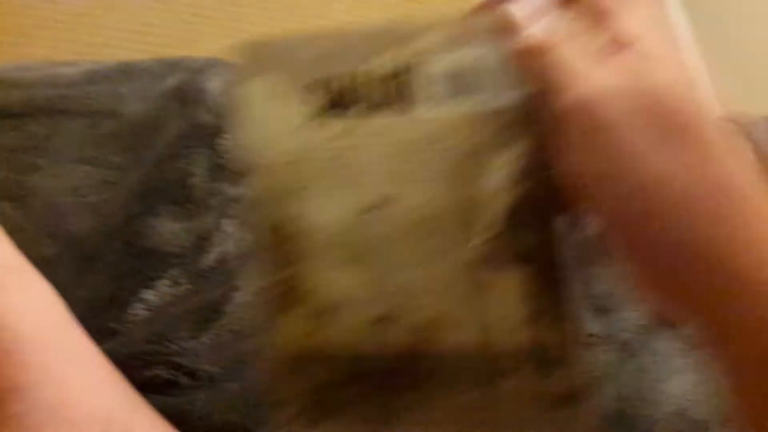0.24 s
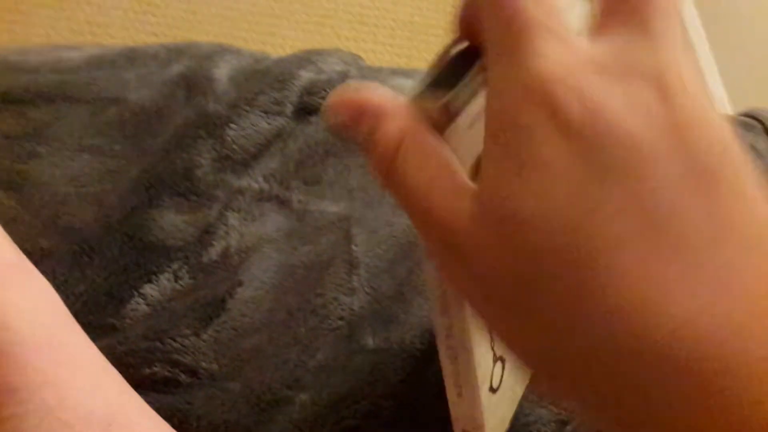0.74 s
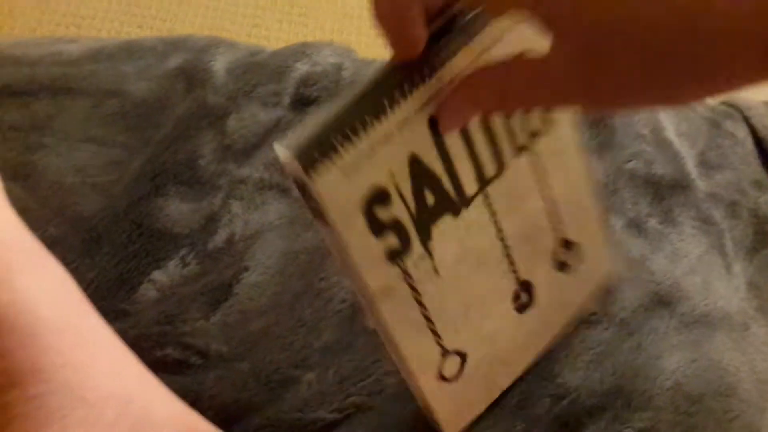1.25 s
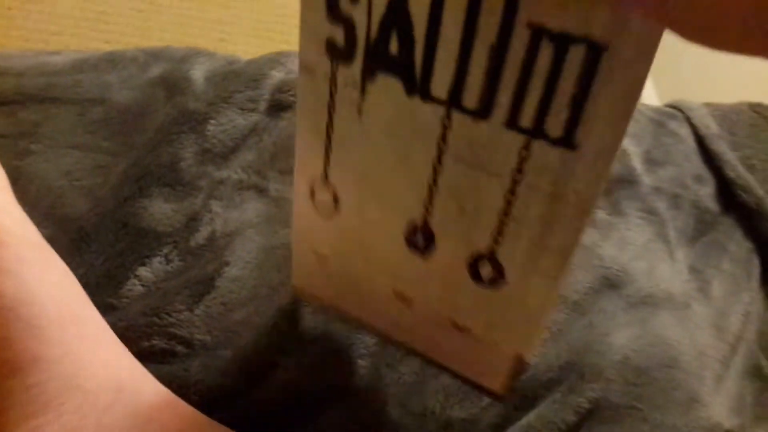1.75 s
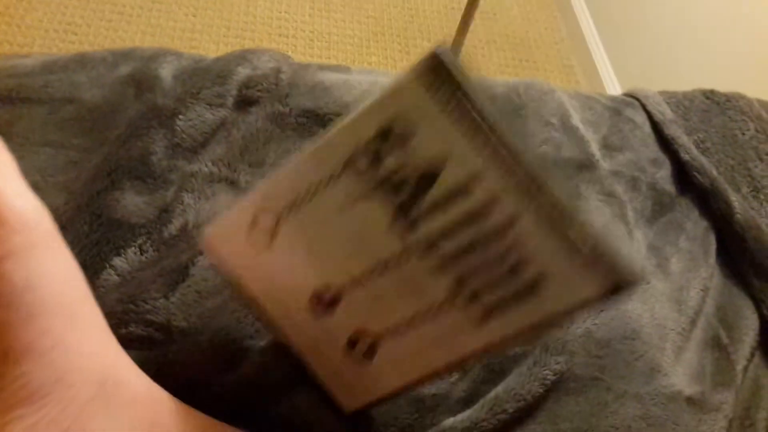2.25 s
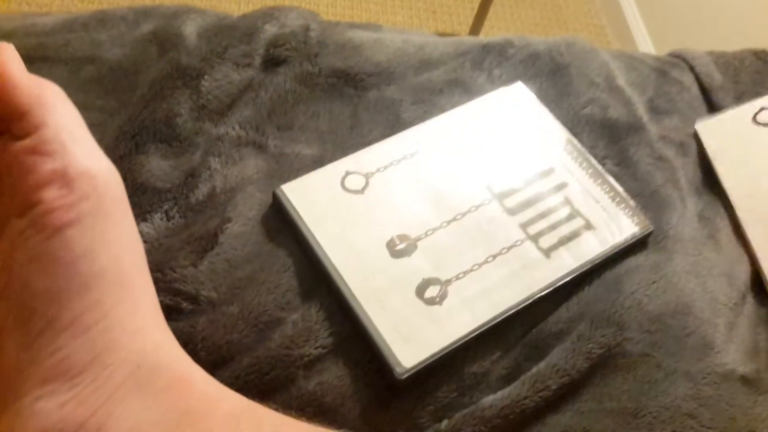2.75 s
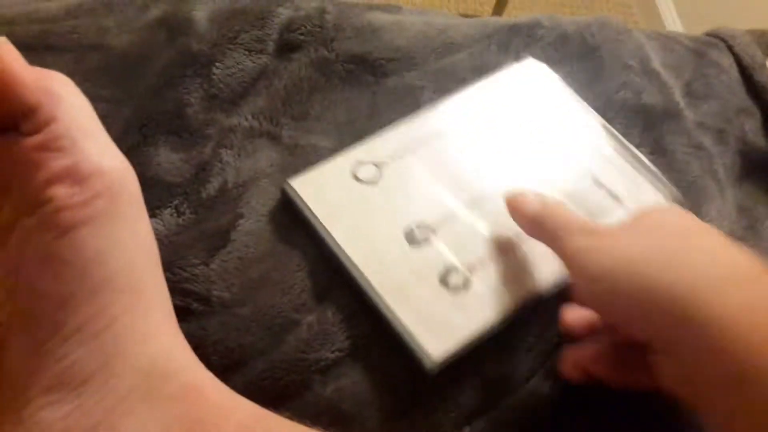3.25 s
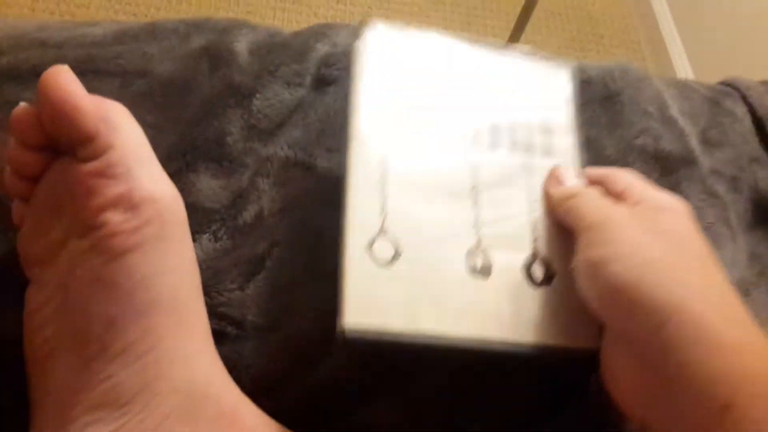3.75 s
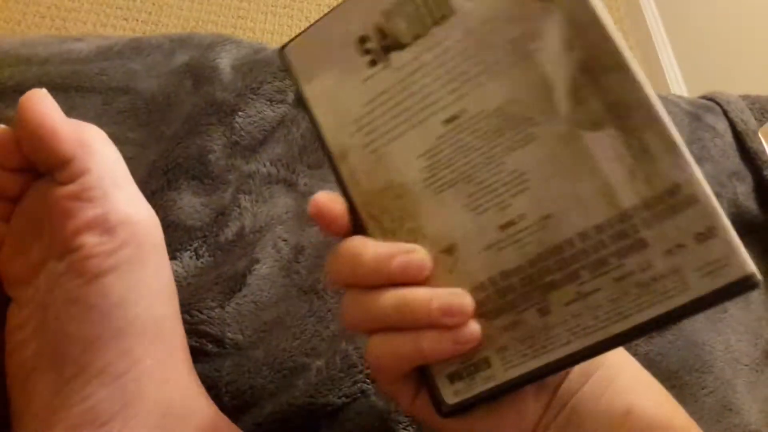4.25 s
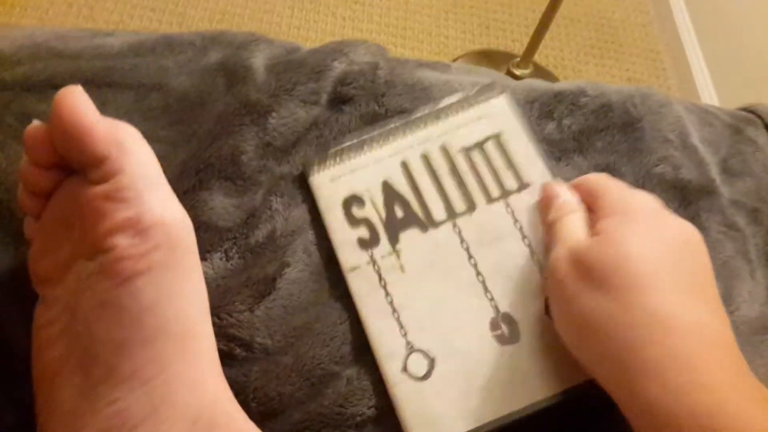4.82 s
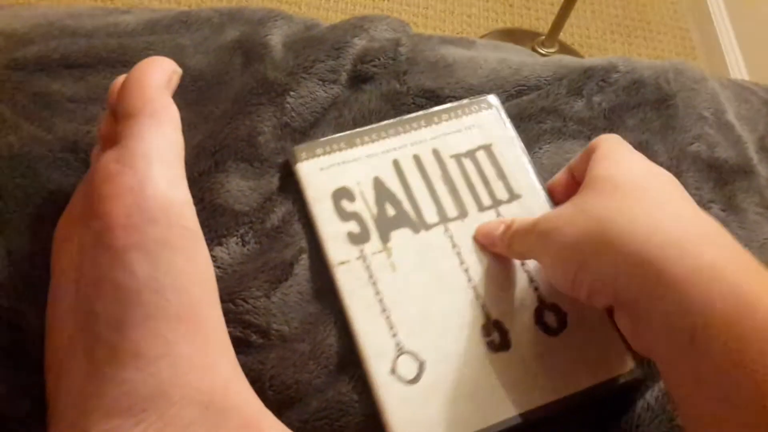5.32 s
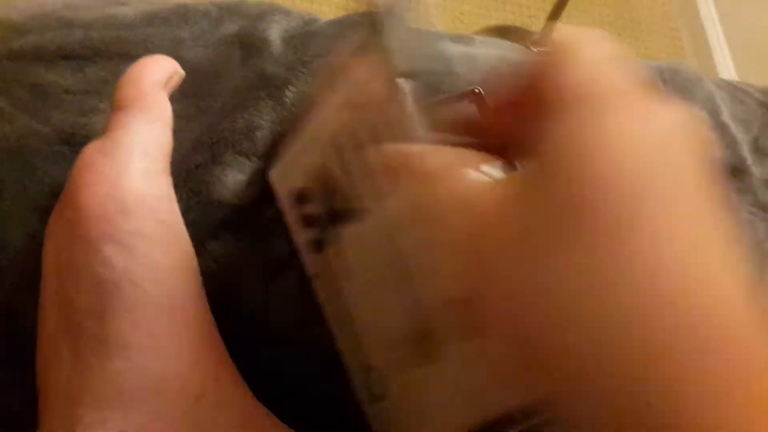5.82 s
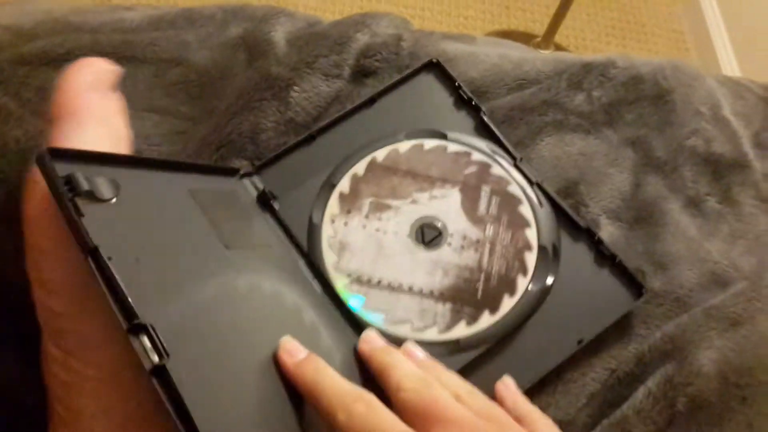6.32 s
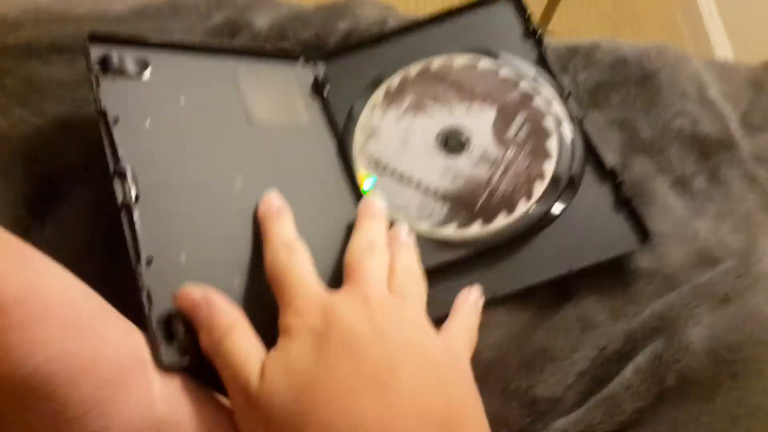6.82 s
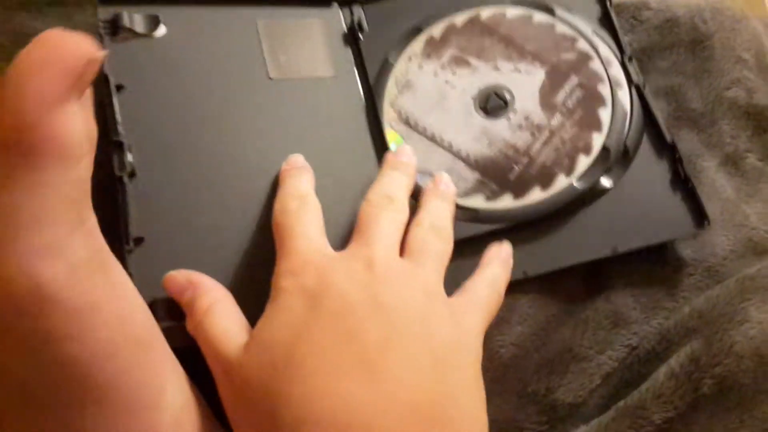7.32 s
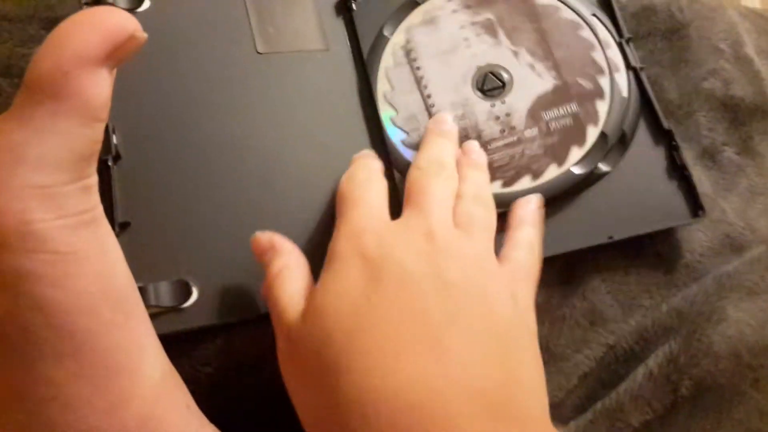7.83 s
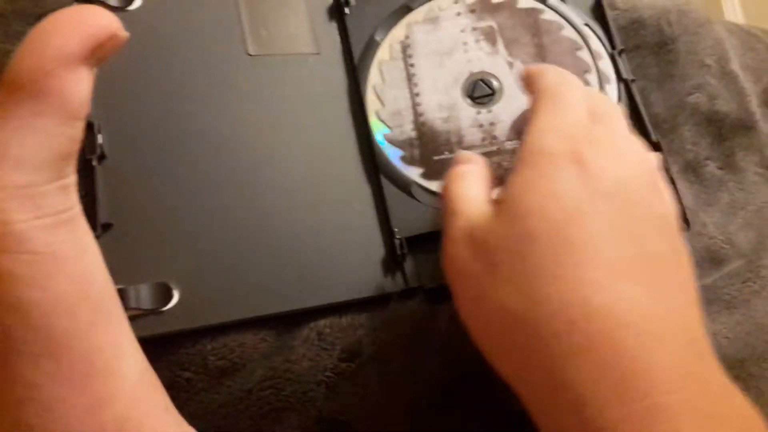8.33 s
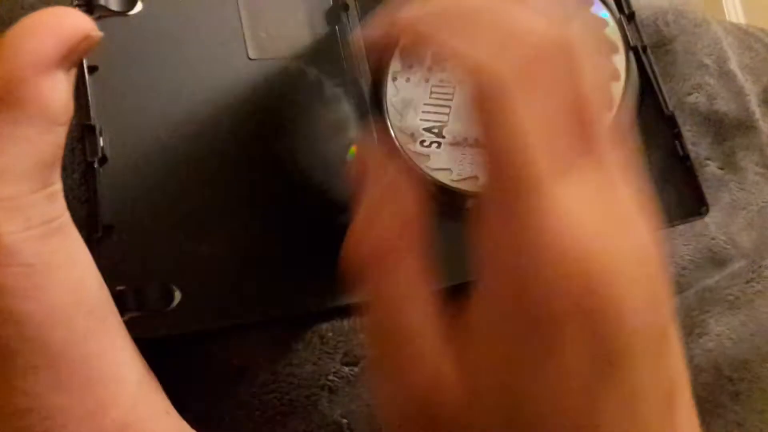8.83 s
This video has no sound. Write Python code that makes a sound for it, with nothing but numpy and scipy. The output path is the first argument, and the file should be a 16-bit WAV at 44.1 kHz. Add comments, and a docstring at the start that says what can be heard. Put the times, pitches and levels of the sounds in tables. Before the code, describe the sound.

A small quiet bedroom, close hand-held microphone, faint hiss and a wavering low mains hum that fades out by about 5 seconds. From 0 to 1.6 s, soft rubs, light ticks and a short bright scrape at 0.85 as card and plastic are handled; a sharp click at 1.6. From 1.75 to 2.3 a loud, rasping, uneven scrape as the case slides from its sleeve. It lands at 2.6 with a muted plastic clack and soft thump. Taps and rubs from 2.9 to 5.4 as it is picked up, turned and set down. At 5.7 very loud, hard latch snaps in quick succession; another sharp crack and bright scraping around 6.13. Cloth whirrs low and wavering from 6.6 to 7. Finger knocks at 7.1 and 7.4, sparse quiet clicks around 8, then a rattling cluster of tray clacks and scrapes from 8.6 to 9.

```python
"""A plastic disc case is drawn out of a card sleeve, dropped on a blanket, picked up, turned over and snapped open.
Knocks and snaps ring the thin shell: short pushes drive its resonances. Card, cloth and fingers rub and scrape
over it as shaped noise, with stray ticks; the cloth whirrs under the open case, and a hinged tray rattles at the end.
Hands and bedding bump softly, as low noise. It is a small bedroom with sparse echoes, faint hiss and mains hum,
heard by one hand-held microphone."""
import sys
import numpy as np
from scipy import signal
from scipy.fft import rfft, irfft
from scipy.io import wavfile
from scipy.ndimage import uniform_filter1d

SR = 44100
rng = np.random.default_rng(int(sys.argv[2]) if len(sys.argv) > 2 else 0)


def dump_mix(stems):
    """Bounce the given channels to the path in sys.argv[1] as a 16-bit WAV at rate SR."""
    frames = np.atleast_2d(stems).T  # one column per channel
    limited = np.clip(frames, -1, 1)  # hard clip at full scale
    pcm = np.round(limited * 32767).astype(np.int16)
    wavfile.write(sys.argv[1], SR, pcm)


N = 399987
TIME = np.arange(N) / SR  # seconds


def amp(db):
    """Turns decibels into gain."""
    return 10 ** (np.asarray(db) / 20)


def unit(x):
    """Scales a sound to an rms of 1."""
    return x / np.sqrt(np.mean(x ** 2) + 1e-20)


def read(points, hz):
    """Reads a table between its points, with pitch on a logarithmic axis."""
    table_hz, value = np.transpose(points)
    return np.interp(np.log(hz + 1), np.log(table_hz + 1), value)


def follow(rows):
    """Draws each column of a timed table as a curve with a value at every sample."""
    time_s, *columns = np.transpose(rows)
    return [np.interp(TIME, time_s, column) for column in columns]


def add(mix, start_s, sound):
    """Lays a sound into the mix at its start time, cut off at the end of the mix."""
    start = round(start_s * SR)
    part = mix[start:start + len(sound)]
    part += sound[:len(part)]


def colour(x, points, size=4096):
    """Filters a sound to the given spectrum, without any sound ahead of its cause."""
    hz = abs(np.fft.fftfreq(size, 1 / SR))
    log_gain = np.log(amp(np.maximum(read(points, hz), -100)))
    # the Hilbert transform gives the phase that puts the response after the input
    taps = np.fft.ifft(np.exp(np.conj(signal.hilbert(log_gain)))).real[:size // 2]
    return signal.fftconvolve(x, taps)[:len(x)]


def drift(hz):
    """A random curve of rms 1 whose changes fade out above about hz per second."""
    f = np.fft.rfftfreq(N, 1 / SR)
    spectrum = rfft(rng.standard_normal(N)) / (1 + (f / hz) ** 4)
    return unit(irfft(spectrum, N))


def resonate(x, hz, width):
    """A resonance of gain 1 at a fixed or moving pitch; a narrower width rings longer."""
    turn = np.exp(2j * np.pi * np.cumsum(hz * np.ones(len(x))) / SR)
    r = np.exp(-np.pi * width / SR)
    # shift the pitch down to zero, smooth there, and shift back up
    smooth = signal.lfilter([1 - r], [1, -r], x / turn + 1e-18)
    return 2 * (turn * smooth).real


# the ways the whole shell can ring; the caller's weight is added to each level
# columns: pitch_hz [Hz], width_hz [Hz], level_db [dB]
SHELL_MODES = [(272, 50, 2), (456, 200, -10), (614, 13, -22), (738, 110, -12.5), (1012, 93, -2),
               (1717, 190, 3.5), (1820, 170, -19), (2314, 320, 2), (3280, 104, 1.5), (3260, 170, -13),
               (3960, 110, -1), (4160, 260, 4), (4610, 320, 3)]


def shell(x, weights_db):
    """The push itself plus the ringing of each mode of the thin shell."""
    out = x.copy()
    for (hz, width, level_db), weight_db in zip(SHELL_MODES, weights_db):
        r = np.exp(-np.pi * width / SR)
        feedback = [1, -2 * r * np.cos(2 * np.pi * hz / SR), r * r]
        out += amp(level_db + weight_db) * signal.lfilter([1 - r, 0, r - 1], feedback, x)
    return out


# loudness of the mains hum, before its waver
# columns: time_s [s], level_db [dB]
HUM_LEVEL = [(0, -59.5), (1.2, -54), (2.1, -53), (2.9, -62.5), (3.2, -65), (3.8, -70.5), (4.4, -59),
             (5.2, -105), (9.07, -83)]
# colour of the hiss in the still room; only the balance counts, as AIR_DB sets the level
# columns: pitch_hz [Hz], density_db [dB per Hz, relative]
AIR_COLOUR = [(18, -58), (30, -15), (48, -27), (108, 8.5), (243, -0.5), (673, -10), (1020, -7), (1200, -10),
              (1720, -12), (2020, -10.5), (3590, -11), (4660, -8), (5590, -14), (14300, -14.5),
              (15500, -14.5)]
AIR_DB = -65


def background(hum_hz=120, second_db=-12, third_db=-22, waver_db=3.0, waver_hz=0.97):
    """Faint hiss, and a mains hum of three harmonics that wavers slightly in pitch and loudness."""
    turn = 2 * np.pi * np.cumsum(hum_hz + waver_hz * drift(8.7)) / SR
    hum = np.sin(turn) + amp(second_db) * np.sin(2 * turn) + amp(third_db) * np.sin(3 * turn)
    hum_gain = amp(follow(HUM_LEVEL)[0] + waver_db * drift(3.6))
    hiss = unit(colour(rng.standard_normal(N), AIR_COLOUR))
    return hum_gain * unit(hum) + amp(AIR_DB) * hiss


# a stroke gathers speed, holds and slows down: shares of its length
ATTACK_SHARE, RELEASE_SHARE = 0.24, 0.48


def swell(length_s):
    """Attack, hold and release of one movement, as a gain from 0 to 1."""
    u = np.linspace(0, 1, max(round(length_s * SR), 2))
    return np.clip(np.minimum(u / ATTACK_SHARE, (1 - u) / RELEASE_SHARE), 0, 1)


# strokes of fingers, card and cloth over the case; the gap is the one under the sliding edge
# columns: start_s [s], length_s [s], dull_rub_db [dB before trim], bright_scrape_db [dB before trim],
# gap_pitch_hz [Hz]
STROKES = [(0.215, 0.18, -66, -62.5, 4340), (0.563, 0.61, -58, -55.5, 4230),
           (0.827, 0.089, -58, -39.5, 2700), (0.865, 0.12, -61, -50.5, 3650), (1.1, 0.22, -60.5, -56, 3700),
           (1.238, 0.18, -51.5, -58, 3800), (1.32, 0.42, -61.5, -60.5, 4000), (1.627, 0.24, -63, -57, 4200),
           (2.307, 0.14, -54, -57, 3950), (2.377, 0.55, -66, -63, 3800), (2.777, 0.31, -60.5, -58, 4000),
           (3.244, 0.3, -68, -56.5, 4500), (3.358, 0.4, -60.5, -58.5, 4000),
           (3.6, 0.28, -52.5, -56.5, 3960), (4.03, 0.46, -65, -63, 4000), (4.742, 0.29, -66.5, -60.5, 4200),
           (4.976, 0.11, -52, -53.5, 3700), (5.244, 0.086, -65.5, -63.5, 4200),
           (5.943, 0.37, -55.5, -48, 3660), (6.159, 0.15, -53, -40.5, 3900),
           (6.245, 0.21, -54.5, -51, 4740), (6.49, 0.84, -56.5, -51, 4420), (7.195, 0.2, -52.5, -53, 1660),
           (7.505, .15, -59, -51, 4360), (7.889, 0.1, -68, -54.5, 4000), (8.002, .06, -67, -62, 3850),
           (8.2, 0.28, -76, -59, 4180), (8.409, .09, -67, -55.5, 4150), (8.628, .085, -54.5, -55, 4100),
           (8.797, .1, -59, -58, 4300), (8.871, 0.25, -55, -46, 4220)]
# the long pull out of the card sleeve
# columns: time_s [s], dull_rub_db [dB before trim], bright_scrape_db [dB before trim],
# gap_pitch_hz [Hz], gap_strength_db [dB]
SLEEVE_PULL = [(1.73, -64, -53, 4330, 2), (1.775, -50.5, -35, 4060, -6), (1.82, -53.5, -36.5, 3080, 13),
               (1.89, -52.5, -45.5, 2900, 8), (1.96, -56, -37.5, 3850, -19), (2.07, -56.5, -36.5, 2450, 8),
               (2.12, -54, -38, 3750, -16), (2.21, -49, -36, 3250, -12), (2.28, -50.5, -43, 3150, 0),
               (2.305, -50, -70, 3500, -10)]
# the holding hand is never quite still: levels between strokes (dB before trim), and the gap at rest
REST_RUB_DB, REST_SCRAPE_DB, REST_GAP_HZ = -70.5, -76, 4040
# pressing the gap below its resting pitch makes it resonate more: at rest (dB), gain per octave, most (dB)
OPEN_GAP_DB, GAP_DB_PER_OCTAVE, MOST_GAP_DB = -6, 31, 8


def movement():
    """Adds up the power of strokes and pull: gives rub gain, scrape gain, gap pitch and gap strength."""
    rub_power = np.full(N, amp(REST_RUB_DB) ** 2)
    scrape_power = np.full(N, amp(REST_SCRAPE_DB) ** 2)
    weighted_hz = scrape_power * REST_GAP_HZ
    for start_s, length_s, rub_db, scrape_db, gap_hz in STROKES:
        power = swell(length_s) ** 2
        stroke_scrape = amp(scrape_db) ** 2 * power
        add(rub_power, start_s, amp(rub_db) ** 2 * power)
        add(scrape_power, start_s, stroke_scrape)
        add(weighted_hz, start_s, stroke_scrape * gap_hz)
    stroke_hz = weighted_hz / scrape_power  # the loudest stroke counts most
    octaves_down = np.log2(REST_GAP_HZ / stroke_hz)
    stroke_db = np.minimum(OPEN_GAP_DB + GAP_DB_PER_OCTAVE * octaves_down, MOST_GAP_DB)

    pull_rub_db, pull_scrape_db, pull_hz, pull_db = follow(SLEEVE_PULL)
    pulling = (TIME > SLEEVE_PULL[0][0]) & (TIME < SLEEVE_PULL[-1][0])
    rub = np.sqrt(rub_power + pulling * amp(pull_rub_db) ** 2)
    scrape = np.sqrt(scrape_power + pulling * amp(pull_scrape_db) ** 2)
    return rub, scrape, np.where(pulling, pull_hz, stroke_hz), np.where(pulling, pull_db, stroke_db)


def friction(grains_per_s, spread_db, smooth_db, flutter_db, flutter_hz):
    """Tiny catches of uneven size over a smooth hiss, under a pressure that flutters."""
    sizes = amp(spread_db * np.minimum(rng.exponential(1, N), 4))
    catches = rng.random(N) < grains_per_s / SR
    grains = unit(sizes * rng.choice([-1, 1], N) * catches)
    hiss = amp(smooth_db) * rng.standard_normal(N)
    return (grains + hiss) * amp(flutter_db * drift(flutter_hz))


def wander(x, depth_db, size=512):
    """As the contact travels, patches of the spectrum swell and fade."""
    z = signal.stft(x, nperseg=size)[2]
    patches = uniform_filter1d(rng.standard_normal(z.shape), size=9, axis=0)  # neighbouring pitches
    patches = unit(uniform_filter1d(patches, size=8, axis=1))  # neighbouring moments
    return signal.istft(z * amp(depth_db * patches), nperseg=size)[1][:N]


# colour of the dull rub, before the shell rings
# columns: pitch_hz [Hz], density_db [dB per Hz, relative]
RUB_COLOUR = [(70, -12), (170, -0.5), (300, 2.5), (600, 0.5), (1000, -6.5), (1500, -8.5), (2200, -17),
              (4000, -28.5), (12000, -49)]
# colour of the bright scrape, before the shell and gap ring
# columns: pitch_hz [Hz], density_db [dB per Hz, relative]
SCRAPE_COLOUR = [(500, -36), (1000, -3.5), (1300, -12), (1700, -6.5), (2100, -5), (3000, 2.5), (4300, 4),
                 (5300, 0.5), (7300, -8.5), (9000, -12), (12500, -14.5), (15500, -16)]


def sliding(rub, scrape, gap_hz, gap_db, rub_trim_db=-1, scrape_trim_db=-1, rub_modes_db=-3,
            scrape_modes_db=-10, gap_width=420, upper_ratio=1.9, upper_db=-2, upper_width=700):
    """Friction drives the shell: a dull rub from skin and cloth, a bright scrape from card and plastic."""
    dull = friction(grains_per_s=400, spread_db=2.5, smooth_db=-0.5, flutter_db=-1.5, flutter_hz=35)
    bright = friction(grains_per_s=970, spread_db=-2.0, smooth_db=3.0, flutter_db=0.44, flutter_hz=68.5)
    dull = shell(colour(dull, RUB_COLOUR), np.full(len(SHELL_MODES), rub_modes_db))
    bright = colour(wander(bright, depth_db=2.3), SCRAPE_COLOUR)
    bright = shell(bright, np.full(len(SHELL_MODES), scrape_modes_db))
    gap = resonate(bright, gap_hz, gap_width)
    gap += amp(upper_db) * resonate(bright, upper_ratio * gap_hz, upper_width)
    bright += amp(gap_db) * gap
    # even out the loudness: the gap changes the colour, the stroke sets the level
    bright /= np.sqrt(uniform_filter1d(bright ** 2, size=3000))
    return amp(rub_trim_db) * rub * unit(dull) + amp(scrape_trim_db) * scrape * bright


def creaks(scrape, per_s=30, gain_db=-8, spread_db=3):
    """The gripped shell gives off faint stray ticks, louder while it slides."""
    sizes = amp(spread_db * np.minimum(rng.exponential(1, N), 2))
    ticks = sizes * (rng.random(N) < per_s / SR)
    ticks = shell(colour(ticks, CONTACT_COLOUR), np.zeros(len(SHELL_MODES)))
    ticks = colour(ticks, [(100, -8), (400, 3), (2000, -5.5), (4000, 5.5)])  # (Hz, dB)
    return amp(gain_db) * scrape * unit(ticks)


# low bumps of the hands and bedding
# columns: start_s [s], length_s [s], level_db [dB before trim]
BUMPS = [(1.343, 0.14, -57), (2.35, 0.088, -60), (2.606, 0.045, -44), (2.875, 0.11, -54), (3.43, 0.13, -65),
         (3.715, 0.3, -58.5), (4.58, 0.096, -57), (4.87, .09, -58), (5, 0.075, -50), (5.683, 0.038, -36),
         (5.819, 0.0432, -48), (6.118, .04, -47), (6.963, 0.37, -60), (7.178, 0.13, -47.5),
         (7.293, 0.21, -51), (7.475, 0.19, -55.5)]


def bumps(rub, trim_db=-1, with_rub_db=-7, with_hum_db=-8):
    """Soft low thumps of shaped noise; a little rumble goes with every rub, and lies under the hum."""
    level = amp(with_rub_db) * rub + amp(with_hum_db + follow(HUM_LEVEL)[0])
    for start_s, length_s, level_db in BUMPS:
        add(level, start_s, amp(level_db + trim_db) * swell(length_s))
    low_colour = [(15, 1), (35, -36), (60, 2.0), (90, 4.0), (135, 5.5),
                  (200, -12.0), (400, -31.5), (2000, -70)]  # (Hz, dB)
    return level * unit(colour(rng.standard_normal(N), low_colour))


# a small, high panel clacks and a wide, low one thuds: where both are equal, and the lean either way
EVEN_PANEL_HZ, LEAN_DB_PER_OCTAVE = 484, 2
# brief or forceful contacts have the sharpest edge: its level under the crack for an ordinary tap,
# then its rise per halving of the contact and per dB of level
EDGE_DB, EDGE_DB_PER_HALVING, EDGE_PER_LEVEL = -17.5, 4.0, 0.26
TAP_S, TAP_DB = 0.006, -40  # the ordinary tap


def registers(contact_s, level_db, weight_db, panel_hz):
    """Levels in dB of thud, clack, crack and edge for one contact, from low to high."""
    lean_db = LEAN_DB_PER_OCTAVE * np.log2(panel_hz / EVEN_PANEL_HZ)
    briefness_db = EDGE_DB_PER_HALVING * np.log2(TAP_S / contact_s)
    edge_db = EDGE_DB + briefness_db + EDGE_PER_LEVEL * (level_db - TAP_DB)
    return level_db + np.array([weight_db - lean_db, weight_db + lean_db, 0, edge_db])


# knocks, snaps and finger taps: the sleeve, the landing on the blanket, picking up and turning over,
# the two latches letting go, fingers on the open case and disc, and the hinged tray swinging over
# columns: start_s [s], contact_s [s, at least 0.001 is played], crack_level_db [dB],
# body_weight_db [dB relative to the crack, before the lean], panel_pitch_hz [Hz], rim_pitch_hz [Hz],
# room_share_db [dB]
KNOCKS = [(0.139, 0.0016, -47, -16, 450, 3630, -23), (0.578, .001, -51, -9.5, 450, 2900, -6),
          (0.618, 0.016, -57.5, 1, 280, 3900, -13), (0.704, 0.0072, -41, 1, 680, 3350, -3.5),
          (0.988, 0.0032, -46, -11, 280, 3930, -20), (1.026, 0.0015, -52, -7, 260, 4080, -7),
          (1.215, 0.0059, -45.5, -2.5, 390, 3220, 0), (1.221, 0.0038, -39.5, -8, 424, 3300, -11),
          (1.61, 0.0016, -47.5, 1.5, 460, 4130, 0.5), (1.6122, 0.00057, -33, -20, 407, 4220, -4),
          (1.7974, 0.0065, -32.5, -26, 400, 3580, -22), (2.176, 0.012, -35, -13.5, 1000, 3350, -2),
          (2.246, 0.0096, -32.5, -10, 490, 2950, -7), (2.278, .008, -41, -15, 523, 3100, -24),
          (2.385, .007, -51.5, -5, 1040, 3940, -2), (2.505, 0.0088, -49, -10.5, 960, 4100, -15),
          (2.615, 0.0052, -46.5, 1.5, 700, 4500, -4), (2.619, 0.0078, -34.5, -0.5, 770, 4000, -8.5),
          (2.627, 0.0086, -36.5, 4.5, 1010, 3830, -9), (2.636, .006, -32.5, -6, 550, 3930, -13),
          (2.661, .009, -44, -5, 830, 3900, -2), (2.913, 0.0029, -41, -5.5, 1420, 4840, -10),
          (2.936, 0.0041, -58, 6, 236, 3950, 2), (3.06, 0.0038, -37, -7.5, 950, 4600, -4),
          (3.409, 0.0049, -42.5, 4, 304, 3500, -11), (3.538, 0.0039, -61.5, 9, 400, 3200, -7),
          (3.585, 0.0082, -55, 0, 250, 3960, 4), (3.627, 0.0032, -39.5, -7, 328, 3940, -6.5),
          (3.729, 0.0095, -36.5, -5, 1030, 4800, -5.5), (3.75, 0.014, -48, -2.5, 1000, 3350, -19),
          (3.835, 0.011, -57, -2.5, 1020, 4650, 0), (3.889, 0.015, -54.5, -2.5, 1020, 3900, -11),
          (4.076, 0.0043, -58.5, 0.5, 317, 3250, -20), (4.803, 0.01, -51, -1, 474, 4650, -5),
          (4.814, 0.0064, -38.5, -10, 444, 4500, -9), (4.839, 0.0073, -49, -3, 920, 4050, -3.5),
          (4.923, .005, -53.5, -4, 440, 4400, -20), (5.006, 0.0081, -44, -12.5, 266, 3800, -4),
          (5.064, 0.0074, -44.5, -8, 360, 4730, -8), (5.35, 0.0074, -60.5, 3.5, 700, 4300, -11),
          (5.383, 0.0018, -56, -5, 340, 4100, 5.5), (5.402, 0.0058, -45.5, -5.5, 430, 3070, -10),
          (5.512, 0.0023, -54.5, -3.5, 422, 4200, -5), (5.577, 0.0026, -57, -3.5, 420, 4400, -21),
          (5.688, 0.006, -21, -3.5, 720, 4080, -6), (5.7071, .007, -22.5, -8, 1640, 4170, -4.5),
          (5.7485, 0.0039, -20, -7.5, 400, 4300, -11.5), (5.8129, 0.0052, -36, -0.5, 355, 4300, -2.5),
          (5.83, 0.0051, -36.5, -14, 1850, 4040, -1.5), (5.979, 0.015, -50.5, -2, 439, 4300, -2),
          (6.064, 0.0043, -41.5, -8, 278, 3500, -9), (6.077, .004, -43, -17, 266, 3320, -6),
          (6.129, 0.0066, -33, -1.5, 258, 4000, -9.5), (6.13, 0.0053, -22, -16.5, 1560, 2980, -3),
          (6.14, 0.016, -27, -21.5, 1620, 3760, -4.5), (6.166, 0.0086, -31.5, -32, 1640, 4200, -19),
          (6.182, .004, -35.5, -13, 444, 4000, -16), (6.301, 0.017, -40.5, -17, 1560, 4900, -7),
          (6.337, 0.013, -45, -9.5, 280, 3950, -13), (6.919, .003, -49.5, -17, 280, 4100, 6),
          (6.95, 0.0087, -43, -9, 320, 4160, -8), (7.076, 0.0073, -36, -12.5, 384, 3900, -3.5),
          (7.093, .01, -40, -6.5, 290, 3430, -3), (7.201, 0.009, -50.5, -8, 1610, 4000, -2),
          (7.4011, 0.0077, -36, -6, 293, 4400, -7.5), (7.8619, 0.0063, -42, -27, 800, 4080, -12),
          (7.922, 0.0078, -48.5, -5, 272, 4200, -8), (7.943, 0.026, -55, -24, 390, 4080, -6),
          (8.012, 0.011, -58, -18, 300, 4000, 4.5), (8.16, 0.019, -54, -7.5, 437, 4400, -5.5),
          (8.194, .008, -58, -10, 440, 3800, -11), (8.362, 0.0029, -52, -8.5, 310, 4000, -4),
          (8.417, .007, -56, -13, 260, 4140, -9), (8.464, 0.009, -49.5, -24, 300, 4140, -15),
          (8.628, 0.006, -49.5, -17, 1730, 3950, 3), (8.643, .01, -44.5, -15, 1730, 4000, -4),
          (8.657, 0.0086, -39.5, -17, 1700, 4170, -7.5), (8.694, 0.0079, -46, -17, 690, 3440, -12),
          (8.833, 0.0041, -40.5, -11.5, 290, 4500, -7), (8.846, 0.0094, -42, -14.5, 1740, 3460, -2.5),
          (8.876, .0075, -45.5, -13, 400, 4100, -12), (8.924, 0.0049, -42, 0.5, 268, 4400, -26),
          (8.933, 0.0047, -37, -4.5, 267, 4600, -2.5), (8.957, 0.007, -38, -8.5, 1840, 4540, -5.5),
          (9.018, .005, -50, -17, 400, 3900, 5), (9.048, .008, -47.5, 1.5, 260, 4100, -6)]
# borders of the thud, clack, crack and edge registers
# column: border_hz [Hz]
REGISTER_BORDERS = [150, 500, 1800, 7000, 15500]
# colour of a contact on the shell
# columns: pitch_hz [Hz], level_db [dB, relative]
CONTACT_COLOUR = [(100, -2), (300, -2), (900, 3.5), (1300, -2), (2000, -4.5), (3200, 5), (4800, 1.5),
                  (6000, -2), (7500, -9.5), (11000, -16), (16000, -20.5)]


def knocks(slips_per_s=3000, slip_db=-6, chatter_db=-24, chatter_t60=0.046, hard_s=0.011, place_db=2,
           panel_db=10, panel_q=5, rim_db=7, rim_width=430, size=4096):
    """A click and a burst of tiny slips ring the shell where they land; gives direct sound and room feed."""
    direct, feed, t = np.zeros(N), np.zeros(N), np.arange(size) / SR
    bands = zip(REGISTER_BORDERS, REGISTER_BORDERS[1:])
    filters = [signal.butter(3, band, "band", fs=SR, output="sos") for band in bands]
    for start_s, contact_s, level_db, weight_db, panel_hz, rim_hz, room_db in KNOCKS:
        contact_s = max(contact_s, 0.001)
        slips, chatter, place = rng.standard_normal((3, size))
        pressure = np.sqrt(np.sin(np.pi * np.minimum(t / contact_s, 1)))  # builds and lets go
        slipping = rng.random(size) < slips_per_s / SR
        push = amp(slip_db) * pressure * np.tanh(slips) * slipping
        push[0] += np.exp(-(contact_s / hard_s) ** 2)  # the briefer the contact, the stronger the click
        # loose parts go on buzzing for a moment after the contact
        buzz_db = chatter_db - 60 * np.maximum(t - contact_s / 2, 0) / chatter_t60
        push += amp(buzz_db) * np.minimum(2 * t / contact_s, 1) * chatter
        push = colour(push, CONTACT_COLOUR)

        ring = shell(push, place_db * place)  # each landing place favours other modes
        ring += amp(panel_db) * resonate(push, panel_hz, panel_hz / panel_q)
        ring += amp(rim_db) * resonate(push, rim_hz, rim_width)
        # each register gets its level over the contact and the 4 ms after it
        blow = round((contact_s + 0.004) * SR)
        knock = np.zeros(size)
        for sos, register_db in zip(filters, registers(contact_s, level_db, weight_db, panel_hz)):
            part = signal.sosfilt(sos, ring)
            knock += amp(register_db) * part / np.sqrt(np.mean(part[:blow] ** 2))
        add(direct, start_s, knock)
        add(feed, start_s, amp(room_db) * knock)
    return direct, feed


# decay of the echoes in the bedroom
# columns: pitch_hz [Hz], decay_s [s to fall by 60 dB, before the treble is softened]
ROOM_DECAY = [(150, 0.47), (400, 0.23), (1000, 0.32), (3000, 0.24), (7000, 0.24), (15000, 0.33)]


def reflections(build_s=0.007, treble_db=-4):
    """Sparse echoes that build up and die away band by band; bedding soaks up the treble."""
    taps = rng.standard_normal(SR // 2) * (rng.random(SR // 2) < 3000 / SR)  # 3000 echoes a second
    hz, t, z = signal.stft(taps, SR, nperseg=256)
    decay = amp(-60 * t / read(ROOM_DECAY, hz)[:, None])
    tail = signal.istft(z * decay, SR, nperseg=256)[1]
    tail *= 1 - np.exp(-(np.arange(len(tail)) / SR / build_s) ** 2)
    return colour(tail / np.linalg.norm(tail), [(5000, 0.035), (10000, treble_db)])


def bedroom(x, count=6, turns_per_s=2.3):
    """The case keeps moving, so each of six echo patterns gives way to the next, round and round."""
    place = count * turns_per_s * TIME
    room = np.zeros(N)
    for k in range(count):
        distance = abs((place - k) % count - count / 2)
        share = np.cos(np.pi / 2 * np.minimum(distance, 1))  # squares of all shares sum to 1
        room += signal.oaconvolve(x * share, reflections())[:N]
    return room


# the open case whirrs softly as it is pushed over the blanket; pitch and level waver around these
# columns: time_s [s], pitch_hz [Hz], level_db [dB]
WHIRR = [(6.52, 191, -75), (6.59, 206.3, -60), (6.64, 220, -64), (6.68, 256.5, -54), (6.77, 243.6, -59),
         (6.85, 244.7, -48.5), (6.95, 273.2, -53.5), (7.02, 282, -55)]


def whirr(unsteady=0.0315, octave_db=-5):
    """The cloth catches and lets go at an unsteady rate: a wavering tone and its octave."""
    hz, level_db = follow(WHIRR)
    turn = 2 * np.pi * np.cumsum(hz * (1 + unsteady * drift(59.7))) / SR
    moving = (TIME > WHIRR[0][0]) & (TIME < WHIRR[-1][0])
    gain = moving * amp(level_db + 2 * drift(13))
    octave = amp(octave_db + 2.2 * drift(5.3)) * np.sin(2 * turn)
    return gain * (np.sin(turn) + octave)


def scene(sliding_room_db=-8):
    """Everything reaches one microphone, the same in both channels."""
    direct, knock_feed = knocks()
    rub, scrape, gap_hz, gap_db = movement()
    rubbing = sliding(rub, scrape, gap_hz, gap_db) + creaks(scrape) + whirr()
    room = bedroom(knock_feed + amp(sliding_room_db) * rubbing)
    mono = direct + rubbing + room + bumps(rub) + background()
    return np.array([mono, mono])


def record(dry, edge_hz=15750):
    """The recorder's band limit: a steep low-pass filter takes away the highest treble."""
    taps = signal.firwin(511, edge_hz, window=("kaiser", 9), fs=SR)
    return signal.oaconvolve(dry, taps[None], "same")


dry = scene()
out = record(dry)
dump_mix(out)
```